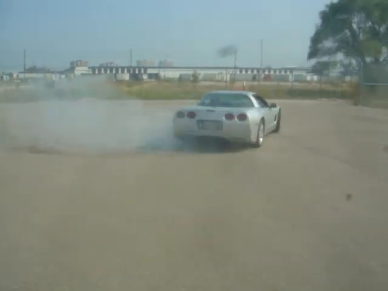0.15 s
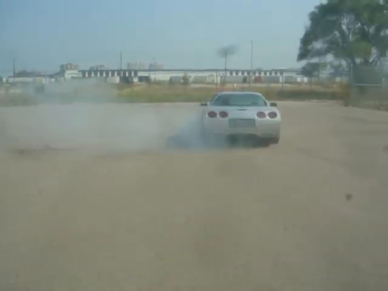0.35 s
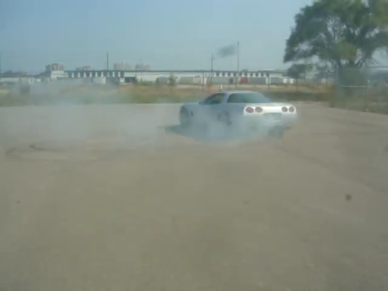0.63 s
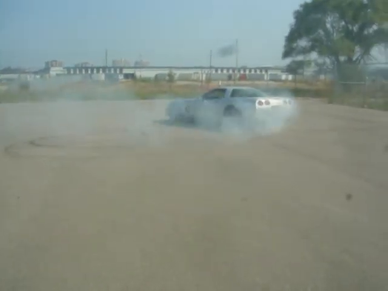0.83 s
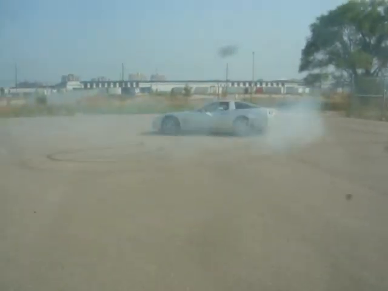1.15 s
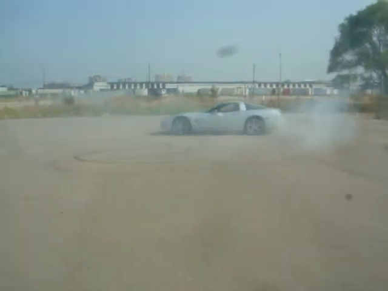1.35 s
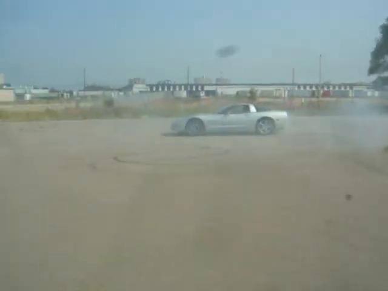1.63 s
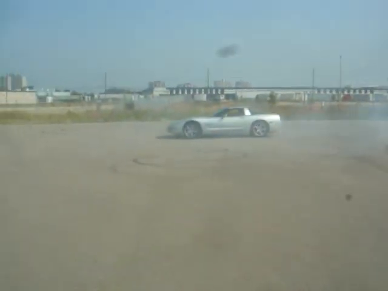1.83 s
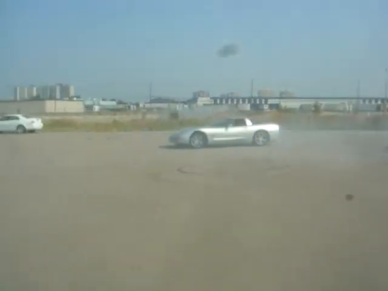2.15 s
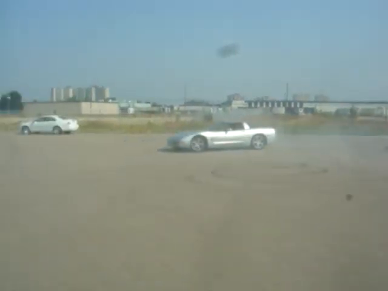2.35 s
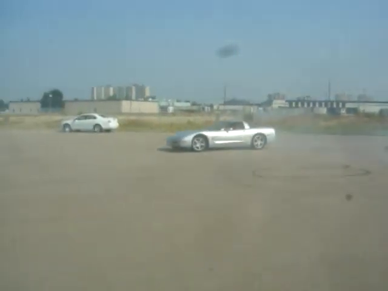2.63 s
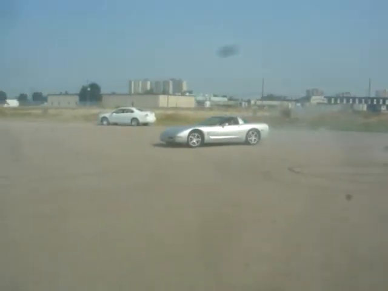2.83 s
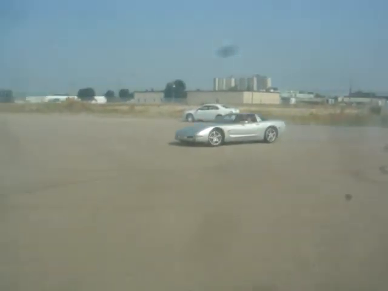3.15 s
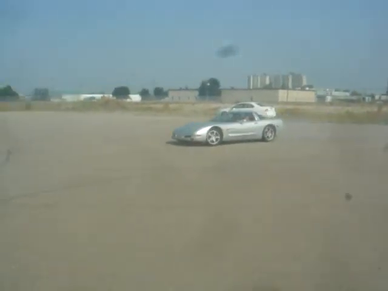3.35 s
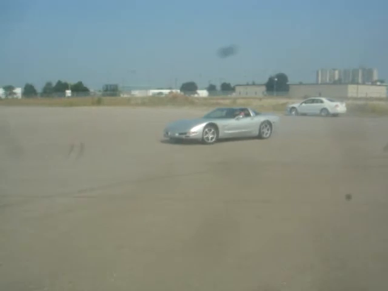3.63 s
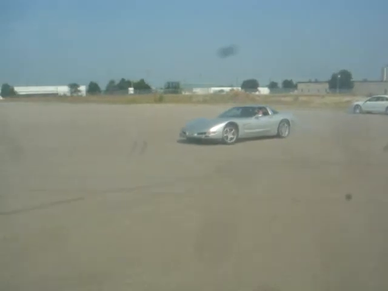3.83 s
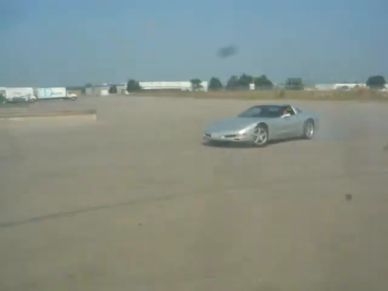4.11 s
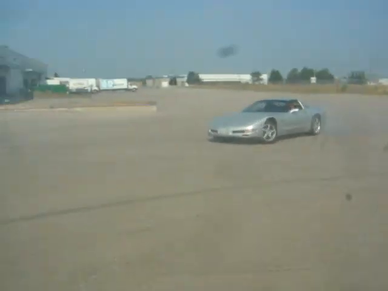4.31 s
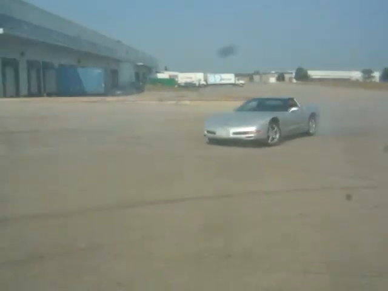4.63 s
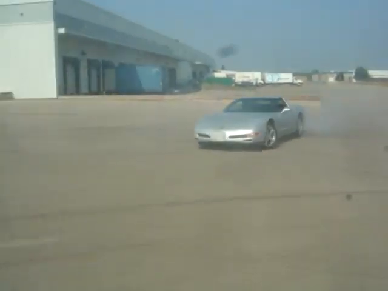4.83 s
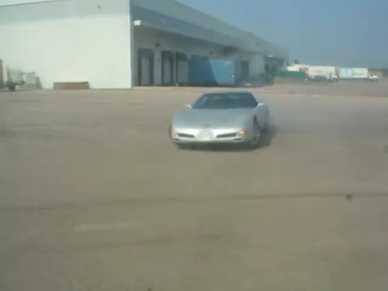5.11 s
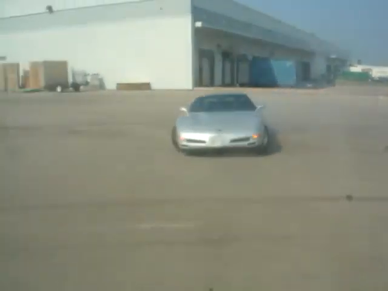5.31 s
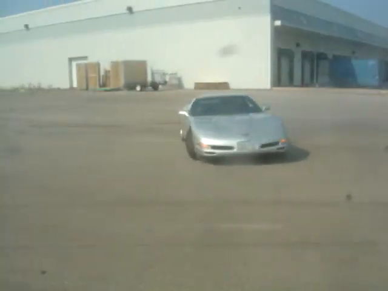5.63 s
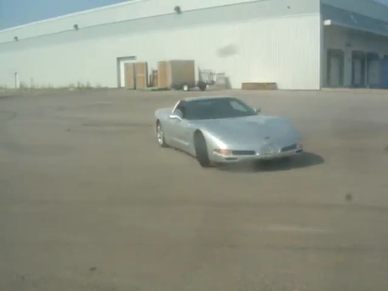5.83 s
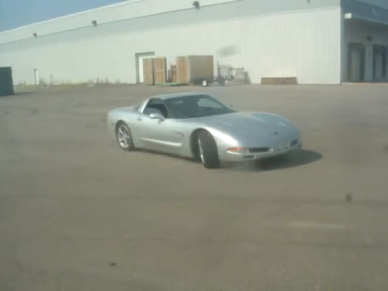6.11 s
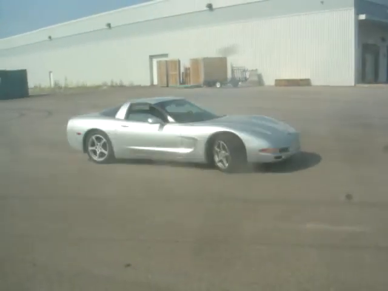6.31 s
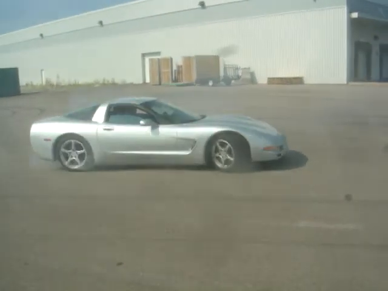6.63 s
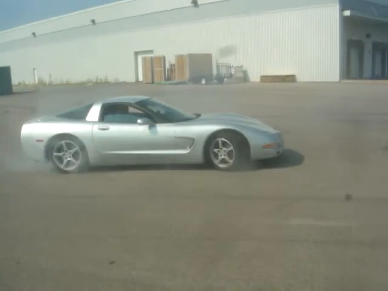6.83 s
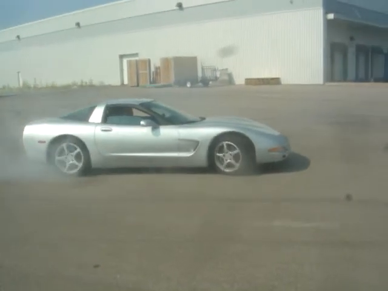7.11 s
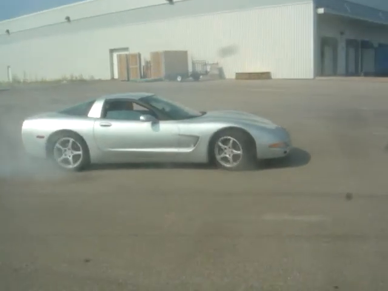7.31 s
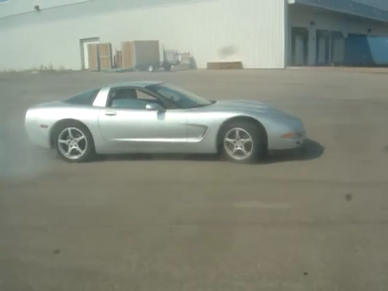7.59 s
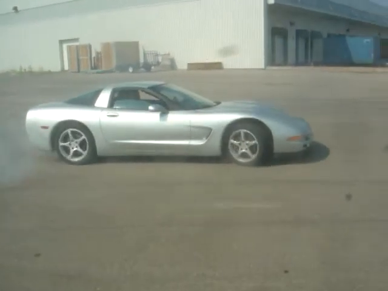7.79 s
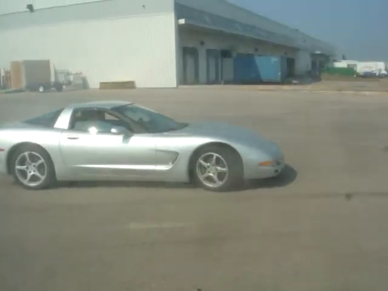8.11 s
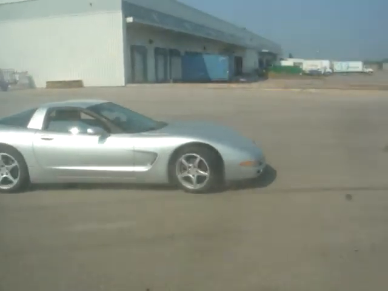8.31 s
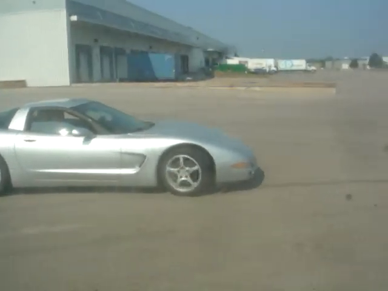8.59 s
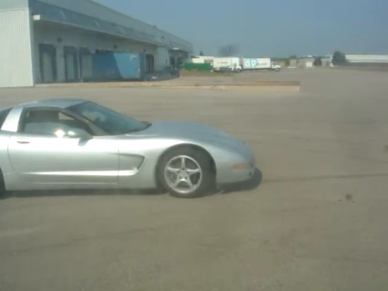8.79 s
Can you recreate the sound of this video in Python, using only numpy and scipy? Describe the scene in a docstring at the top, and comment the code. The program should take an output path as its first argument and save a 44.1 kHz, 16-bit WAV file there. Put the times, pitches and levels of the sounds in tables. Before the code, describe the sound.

A car's tyres squeal and scrub through spins as its V8 engine revs, then it stops with clacks and revs gently.

```python
"""A juddering tyre squeal comes first: a V8 car spins its rear wheels in circles on an open paved lot. Tread
rubber sticks and slips in two bands over a broad scrub, with the exhaust humming underneath. The car stops with
a few clacks, then revs gently. A reflection close to the microphone colours tyres and bodywork; wind thumps on
the microphone, which overloads on the loudest peaks."""
import sys
import numpy as np
from scipy import signal
from scipy.fft import rfft, irfft
from scipy.io import wavfile
from scipy.ndimage import uniform_filter1d

SR = 44100
rng = np.random.default_rng(int(sys.argv[2]) if len(sys.argv) > 2 else 0)


def dump(signal):
    """Clip the signal to [-1, 1] and save it as 16-bit WAV at the path in sys.argv[1]."""
    limited = np.clip(np.atleast_2d(signal).T, -1, 1)
    pcm = np.round(limited * 32767).astype(np.int16)
    wavfile.write(sys.argv[1], SR, pcm)


N = 394694
T = np.arange(N) / SR

# wind bed on the microphone: time_s, level_db
WIND_LEVEL = [(0, -34), (1.2, -48), (2.5, -37.5), (3.4, -32), (4.4, -42.5), (5.3, -42.5), (5.7, -47.5),
              (6.9, -49.5), (8.4, -48.5), (8.95, -38)]
# tone colour of the wind: frequency_hz, level_db
WIND_EQ = [(15, -50.5), (30, -31), (80, -7), (170, 2), (280, 1.5), (450, -7.5), (800, -56)]
# gusts that thump the microphone: start_s, level_db
GUSTS = [(.279, -53), (.848, -27.5), (1.12, -38), (1.348, -44), (2.872, -11.5), (2.99, -14), (3.183, -33),
         (3.38, -22), (3.548, -22.5), (3.729, -13), (3.948, -22), (4.314, -26), (5.664, -42), (6.811, -38),
         (7.439, -38)]
# lag of the close reflection: time_s, delay_ms
ECHO_DELAY = [(0, 1.5), (2.499, 1.596), (5, 1.487), (6, 1.444), (8.95, 1.343)]
# strength of that echo: frequency_hz, share_of_direct_sound
ECHO_STRENGTH = [(400, 0.92), (1000, 0.47), (1700, 0.32), (2600, 0.3), (4000, 0.24), (9000, 0.033)]
# fan, belts and intake under the bonnet: time_s, level_db
BAY_LEVEL = [(6.7, -54), (6.9, -41), (7.5, -41), (7.95, -40), (8.2, -37.5), (8.95, -35)]
# tone colour of their rush: frequency_hz, level_db
BAY_EQ = [(250, -10.5), (700, -2.5), (1400, -5.5), (2200, -11.5), (4000, -12), (6000, -22.5), (10000, -30)]
# clacks as the car rocks to a halt: start_s, peak_db
CLACK_HITS = [(6.997, -21.5), (7.051, -19), (7.12, -13.5), (7.175, -18), (7.219, -12), (7.286, -10.5),
              (7.912, -27)]
# resonances that each clack rings: frequency_hz, width_hz, level_db
CLACK_RESONANCES = [(831, 94, 11.5), (1335, 720, 17.5), (2540, 960, 16), (4570, 1840, 8.5)]
# engine speed: time_s, firing_rate_hz
REVS = [(0, 208), (.27, 158.6), (.65, 191), (.87, 161.9), (1.1, 181), (1.27, 183), (1.47, 145.6),
        (2.05, 208.5), (2.6, 224.7), (3.25, 281.1), (3.6, 311.5), (4.1, 328.6), (4.28, 318.2), (4.45, 264),
        (4.8, 255.3), (5.15, 171.8), (5.8, 83.03), (6.2, 100.5), (6.7, 53.8), (7.5, 42), (7.8, 52),
        (8.15, 97), (8.4, 101.3), (8.95, 87.5)]
# stretches where the engine pulls: start_s, length_s, firing_tone_db
ENGINE_PULLS = [(0, 0.029, -28), (0.453, 0.15, -29.5), (1.02, .18, -37), (1.622, .15, -38.5),
                (2.028, .55, -32.5), (2.946, 0.31, -28), (3.597, 0.46, -36), (4.58, 0.11, -37),
                (4.956, 0.053, -41.5), (5.999, 0.31, -49), (7.844, 0.49, -43.5), (8.8, 0.17, -41)]
# lope of the uneven cylinders: time_s, level_db
LOPE_LEVEL = [(0, -50), (1.4, -51.5), (1.7, -53), (2.3, -51), (2.75, -37), (3.5, -34), (4.3, -38),
              (5.1, -71), (5.5, -80), (7.6, -64), (8.95, -64)]
# partials of the lope: multiple_of_firing_rate, offset_db
LOPE_PARTIALS = [(.625, -2), (.75, -3), (.875, -3), (1.125, -9), (1.25, -13), (1.75, -20), (2.25, -18),
                 (2.5, -26)]
# exhaust resonances that lift a passing lope partial: frequency_hz, width_hz, boost_db
EXHAUST_RESONANCES = [(555, 45, 18), (720, 40, 25)]
# tone colour of the tyres' groan: frequency_hz, level_db
GROAN_EQ = [(350, -18), (550, 3), (750, 6), (1000, 11), (1300, -37.5)]
# tone colour of the scrub: frequency_hz, level_db
SCRUB_EQ = [(300, -29), (700, -9), (1300, 2), (2050, -4.5), (3100, -0.5), (4000, -4.5), (5200, -11.5),
            (7000, -23), (10000, -31.5)]
# shrill tyre chirps: start_s, length_s, from_hz, to_hz, level_db
CHIRPS = [(0.546, 0.014, 3120, 3200, -9), (0.571, 0.0141, 3385, 3434, -11),
          (0.598, 0.0381, 3350, 2910, -12.5), (0.633, 0.0342, 2900, 3000, -15),
          (1.763, 0.0918, 3054, 3302, -20), (2.201, 1.1, 2942, 3150, -23), (2.56, 0.082, 3025, 3150, -22),
          (2.77, 0.057, 3003, 3050, -22)]
# lapses of grip, where the squeal ducks: centre_s, length_s, dip_db
GRIP_LAPSES = [(0, 0.11, -4.5), (0.125, 0.085, -4), (.53, .16, -7), (0.665, 0.078, -7.5),
               (1.158, 0.11, -2.5), (5.48, 0.17, -3.5)]
# the sliding tread: time_s, pitch_hz, pitch_spread_share, lower_band_db, upper_band_db, scrub_treble_db
SKID = [(0, 1330, 0.095, -11.5, -16, -22.5), (.45, 1345, .11, -11.5, -15, -25.5),
        (.8, 1353, .08, -11.5, -16, -29.5), (1.2, 1274, 0.061, -18, -21, -33),
        (1.5, 1215, .05, -16, -20, -36), (1.72, 1319, .06, -18.5, -21.5, -34.5),
        (2.05, 1326, 0.098, -20, -27, -33), (2.5, 1353, .11, -21, -26, -28),
        (3.4, 1328, .12, -25.5, -20, -22.5), (4.2, 1364, .12, -19, -18.5, -21.5),
        (4.6, 1326, 0.16, -11, -16, -25), (5.3, 1389, 0.16, -10, -15.5, -24.5),
        (5.62, 1258, .18, -11, -21, -30), (6.2, 1297, 0.22, -14, -18, -25),
        (6.76, 1407, 0.12, -16, -25, -33.5), (6.85, 1411, 0.087, -21, -34, -41),
        (6.97, 1550, .03, -34, -57, -65)]


def gain_of(db):
    """Decibels to gain."""
    return 10 ** (np.asarray(db) / 20)


def unit_rms(x):
    """The signal scaled to rms 1."""
    return x / np.sqrt(np.mean(abs(x) ** 2) + 1e-20)


def eq_at(points, hz):
    """An EQ curve at the frequencies hz, on a log frequency axis."""
    point_hz, value = np.transpose(points)
    return np.interp(np.log(hz + 1), np.log(point_hz + 1), value)


def automation(rows):
    """One per-sample curve for each column after the time."""
    time_s, *columns = np.transpose(rows)
    return [np.interp(T, time_s, column) for column in columns]


def coloured_noise(eq):
    """Noise of rms 1 shaped by an EQ curve."""
    hz = np.fft.rfftfreq(N, 1 / SR)
    return unit_rms(irfft(rfft(rng.standard_normal(N)) * gain_of(eq_at(eq, hz)), N))


def drift(top_hz):
    """A random wobble of rms 1 that rolls off above top_hz."""
    pole = np.exp(-2 * np.pi * top_hz / SR)
    return unit_rms(signal.lfilter([1], np.convolve([1, -pole], [1, -pole]), rng.standard_normal(N)))


def ring(x, hz, width_hz):
    """A steep resonance: the same peak filter twice."""
    peak = signal.iirpeak(hz, hz / width_hz, SR)
    return unit_rms(signal.lfilter(*peak, signal.lfilter(*peak, x)))


def wind(gust_t60_s=0.32):
    """Air buffets the microphone: a low, lumpy bed that swells at each gust."""
    force = gain_of(automation(WIND_LEVEL)[0] + 3 * drift(8.2))
    for start_s, db in GUSTS:
        t = np.maximum(T - start_s, 0)
        force += gain_of(db - 60 * t / gust_t60_s) * (1 - np.exp(-t / 0.018))
    return force * coloured_noise(WIND_EQ)


def near_reflection(x):
    """Adds one reflection close to the microphone, whose delay drifts slightly: a comb filter."""
    hz, frame_s, spectrum = signal.stft(x, SR, nperseg=1024)
    time_s, delay_ms = np.transpose(ECHO_DELAY)
    lag = 2 * np.pi * hz[:, None] * np.interp(frame_s, time_s, delay_ms) / 1000
    share = np.clip(eq_at(ECHO_STRENGTH, hz), 0, 1)[:, None]
    comb = (1 + share * np.exp(-1j * lag)) / (1 + share)
    return signal.istft(spectrum * comb, SR, nperseg=1024)[1][:N]


def engine_bay():
    """Fan, belts and intake rush under the bonnet with a slight flutter."""
    return gain_of(automation(BAY_LEVEL)[0] + 1.4 * drift(40)) * coloured_noise(BAY_EQ)


def clacks(t60_s=0.098, neutral_peak_db=-16.5):
    """The car rocks to a halt: quick noise bursts ring the same few modes, brighter on harder hits."""
    out, t = np.zeros(N), T[:8000]
    attack = (1 - np.exp(-t / .001)) ** 2
    for start_s, peak_db in CLACK_HITS:
        burst = rng.standard_normal(len(t)) * attack * gain_of(-60 * t / t60_s)
        tilt_db_per_octave = 0.43 * (peak_db - neutral_peak_db)
        clack = sum(gain_of(db + tilt_db_per_octave * np.log2(hz / 1000)) * ring(burst, hz, width_hz)
                    for hz, width_hz, db in CLACK_RESONANCES)
        at = round(start_s * SR)
        out[at:at + len(t)] += gain_of(peak_db) * clack / abs(clack).max()
    return out


def pull_db(swell_db_per_s=64, fall_db_per_s=70, coast_db=-58):
    """The firing tone swells into each pull, holds, and falls back towards coasting."""
    level_db = np.full(N, coast_db)
    for start_s, length_s, db in ENGINE_PULLS:
        before_s, after_s = np.maximum(start_s - T, 0), np.maximum(T - start_s - length_s, 0)
        level_db = np.maximum(level_db, db - swell_db_per_s * before_s - fall_db_per_s * after_s)
    return level_db


def exhaust():
    """The firing tone and its octave hum over a lope from cylinders that fire unevenly."""
    firing_hz = uniform_filter1d(automation(REVS)[0], size=5000) * (1 + 0.0038 * drift(7.03))
    phase = 2 * np.pi * np.cumsum(firing_hz) / SR
    octave_db = -10 - 11.5 * np.log2(firing_hz / 100)  # thins out as the revs climb
    hum = gain_of(pull_db()) * (np.sin(phase) + gain_of(octave_db) * np.sin(2 * phase))
    lope_db = automation(LOPE_LEVEL)[0]
    for multiple, offset_db in LOPE_PARTIALS:
        lift_db = sum(boost_db * np.exp(-((multiple * firing_hz - hz) / width_hz) ** 2)
                      for hz, width_hz, boost_db in EXHAUST_RESONANCES)
        level = gain_of(lope_db + offset_db + lift_db + 3 * drift(2))
        hum += level * np.sin(multiple * phase + 2 * np.pi * rng.random())
    return np.sqrt(2) * hum


def lapse_db():
    """Smooth dips where the tread lets go."""
    return sum(db * np.cos(np.pi * np.clip((T - centre_s) / length_s, -.5, .5)) ** 2
               for centre_s, length_s, db in GRIP_LAPSES)


def groan(treble_db, dip_db, base_db=-28, fade_start_s=5.985, fade_db_per_s=60):
    """The tyres' low voice loosely rides the scrub and pushes forward when grip lapses."""
    level_db = base_db + 0.29 * (treble_db - np.median(treble_db)) - 0.77 * dip_db
    fade_db = fade_db_per_s * np.maximum(T - fade_start_s, 0)
    return gain_of(level_db - fade_db) * coloured_noise(GROAN_EQ)


def scrub(treble_db, dip_db, over_treble_db=8.5):
    """Rubber drags over the pavement: broad noise, made gravelly by loose grit."""
    grit_db = 1.7 * drift(150) + 1.1 * drift(20)
    return gain_of(treble_db + over_treble_db + 0.74 * dip_db + grit_db) * coloured_noise(SCRUB_EQ)


def stick_slip(hz, width_hz, wander):
    """Rubber's fuzzy whistle: a tone with a noisy envelope on a wandering pitch."""
    tone = np.exp(2j * np.pi * np.cumsum(hz * (1 + wander * drift(30.12))) / SR)
    envelope = drift(width_hz) + 1j * drift(width_hz) + 0.48
    return (tone * envelope).real


def chirps():
    """Ragged high glides when a tyre edge catches."""
    hz, level = np.full(N, 3100.), np.zeros(N)
    for start_s, length_s, from_hz, to_hz, db in CHIRPS:
        at, n = round(start_s * SR), round(length_s * SR)
        hz[at:at + n] = np.linspace(from_hz, to_hz, n)
        level[at:at + n] += gain_of(db) * signal.windows.tukey(n, .5)
    return level * unit_rms(stick_slip(hz, width_hz=320, wander=.024))


def squeal(dip_db, sag_per_db=.012):
    """Tread blocks stick and slip in two bands, each at its own wavering pitch; one block sings out."""
    hz, spread, lower_db, upper_db, _ = automation(SKID)
    upper_hz = 2570 * (hz / 1330) ** .5  # bends half as far as the lower band
    lower_hz = hz * (1 + sag_per_db * dip_db)  # the pitch sags in each lapse
    lead = gain_of(4.5) * stick_slip(lower_hz * (1 + .3 * spread * drift(4)), width_hz=30, wander=.012)
    lower = upper = 0
    for _ in range(5):
        detune = 1.4 * spread * np.tanh(.8 * drift(10))
        lower += stick_slip(lower_hz * (1 + detune), width_hz=92, wander=.015)
    for _ in range(4):
        detune = .45 * spread * drift(12)
        upper += stick_slip(upper_hz * (1 + detune), width_hz=200, wander=.02)
    lower_band = gain_of(lower_db + dip_db) * unit_rms(lead + lower)
    return lower_band + gain_of(upper_db + 1.9 * dip_db) * unit_rms(upper)


def tyres(release_s=0.028):
    """Scrub, groan, squeal and chirps judder together and cut off as the skid ends."""
    judder_db = 0.79 * drift(5.4)  # grip comes and goes many times a second
    treble_db, dip_db = automation(SKID)[4], lapse_db()
    rubber = scrub(treble_db, dip_db) + groan(treble_db, dip_db) + squeal(dip_db) + chirps()
    gate = np.clip((SKID[-1][0] - T) / release_s, 0, 1)
    return rubber * gain_of(judder_db) * gate


def scene():
    """The mono mix: tyres, engine bay and clacks take the close reflection; exhaust and wind stay dry."""
    return (near_reflection(tyres() + engine_bay() + clacks()) + exhaust() + wind())[None]


def low_pass(x, edge_hz):
    """A steep high cut."""
    return signal.oaconvolve(x, signal.firwin(511, edge_hz, window=("kaiser", 9), fs=SR)[None], "same")


def record(dry):
    """A high cut dulls the top end; the loudest peaks overload and round off; a last high cut follows."""
    ceiling = .74
    drive = low_pass(dry, edge_hz=10050) / ceiling
    clipped = ceiling * drive / (1 + drive ** 12) ** (1 / 12)
    return low_pass(clipped, edge_hz=15750)


dry = scene()
out = record(dry)
dump(out)
```